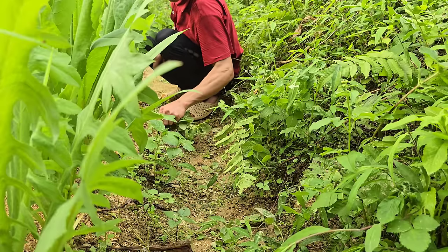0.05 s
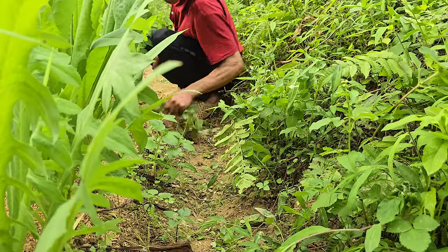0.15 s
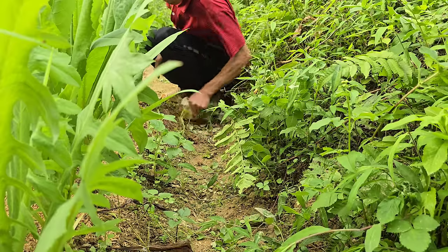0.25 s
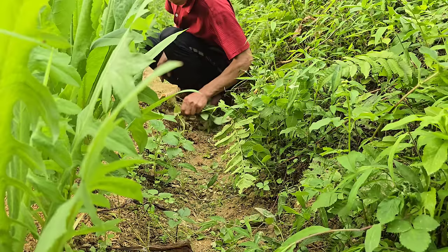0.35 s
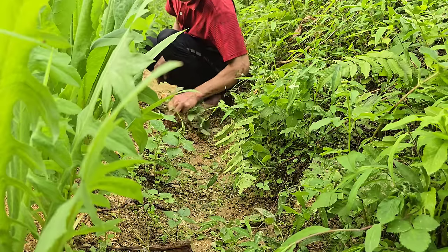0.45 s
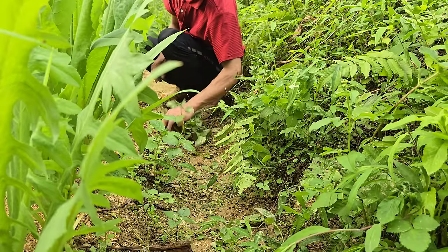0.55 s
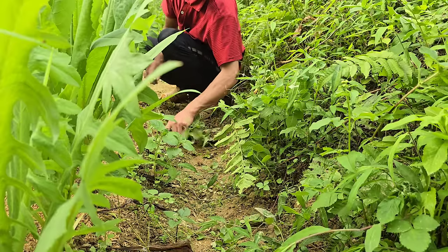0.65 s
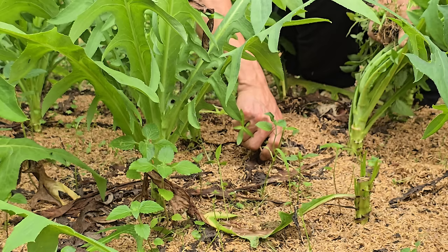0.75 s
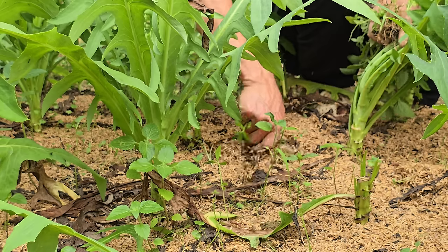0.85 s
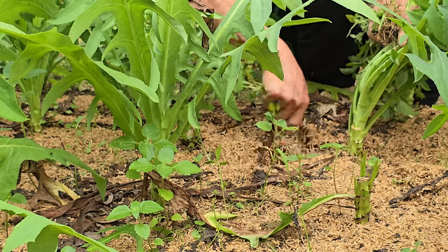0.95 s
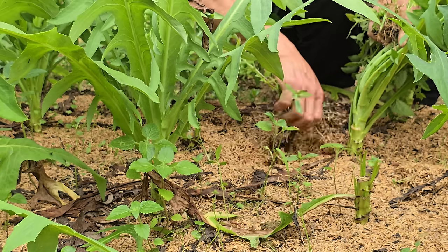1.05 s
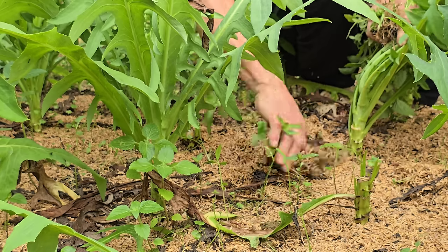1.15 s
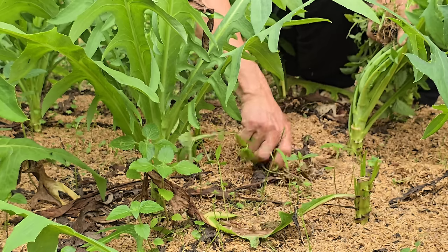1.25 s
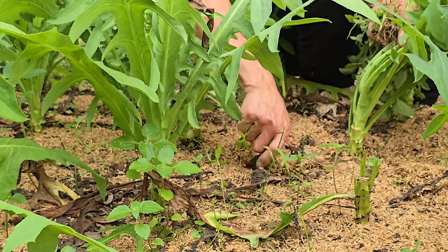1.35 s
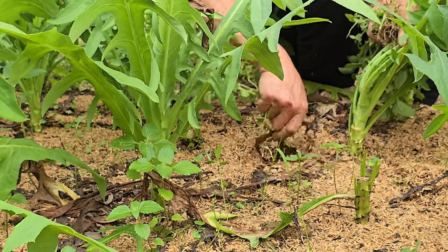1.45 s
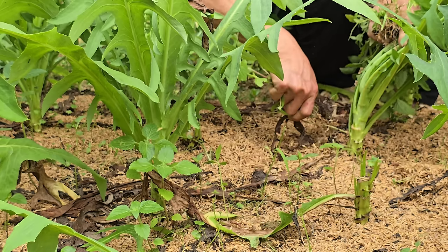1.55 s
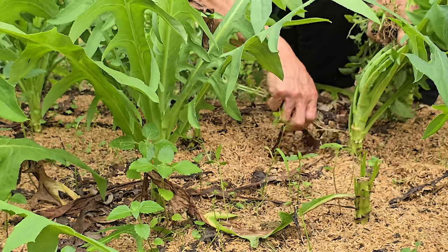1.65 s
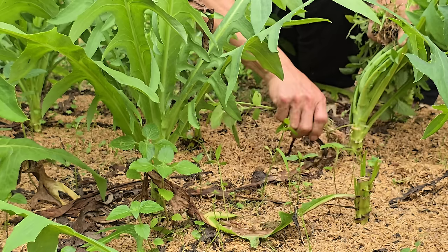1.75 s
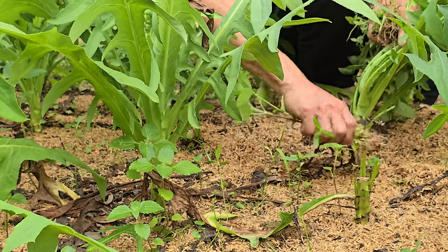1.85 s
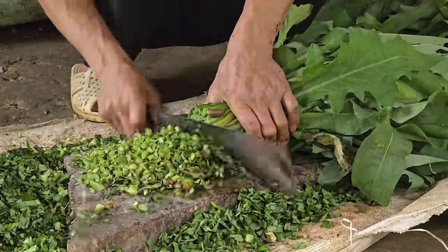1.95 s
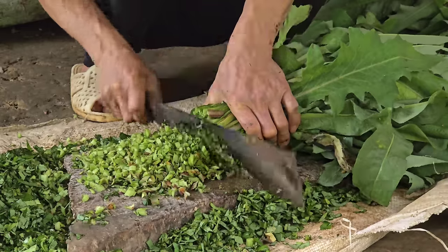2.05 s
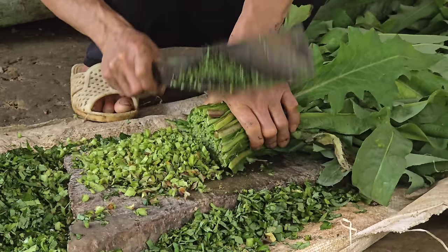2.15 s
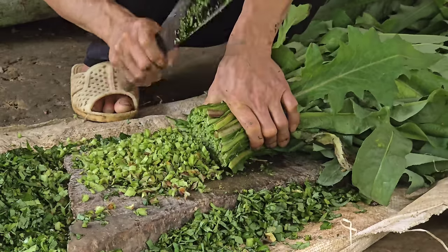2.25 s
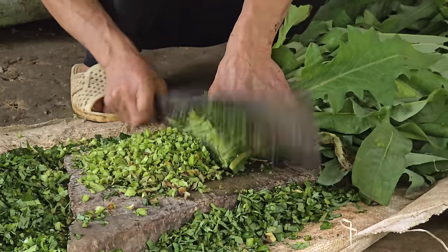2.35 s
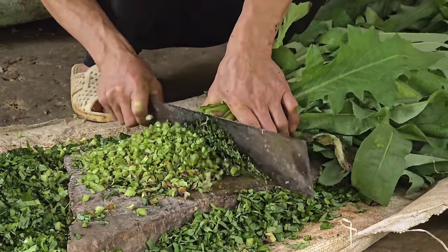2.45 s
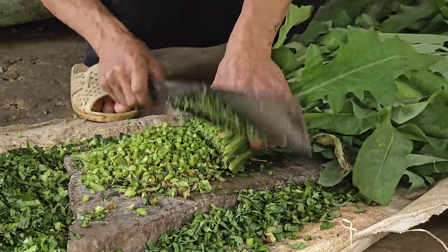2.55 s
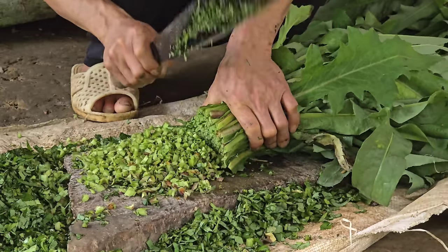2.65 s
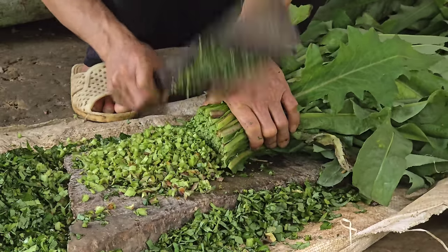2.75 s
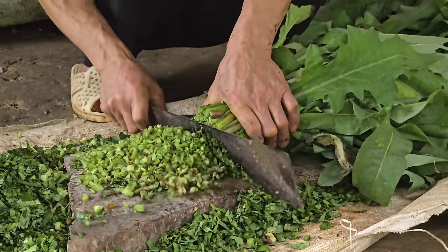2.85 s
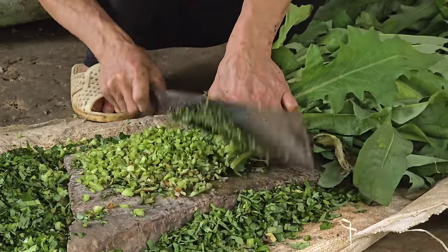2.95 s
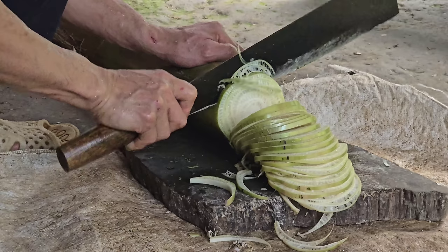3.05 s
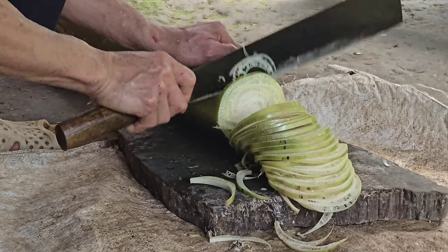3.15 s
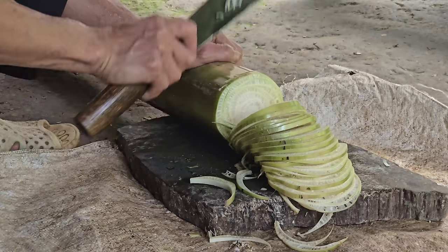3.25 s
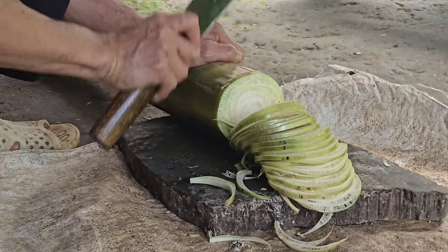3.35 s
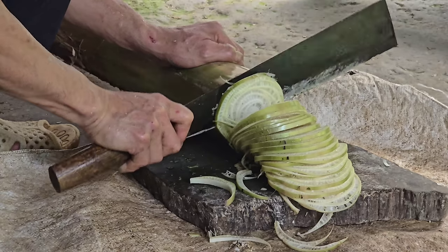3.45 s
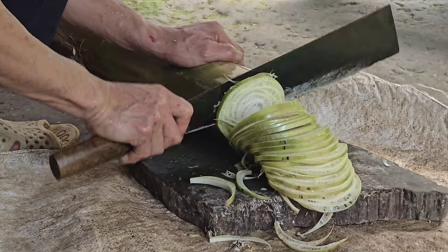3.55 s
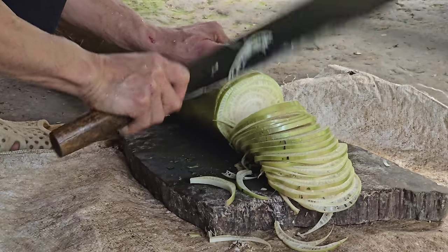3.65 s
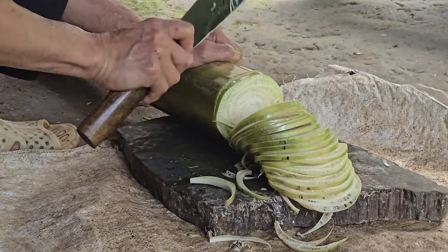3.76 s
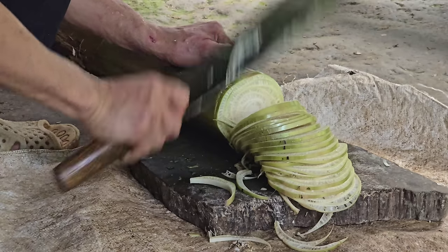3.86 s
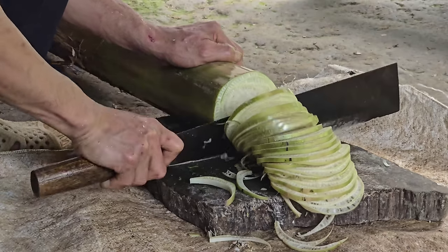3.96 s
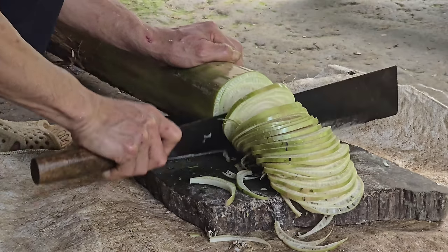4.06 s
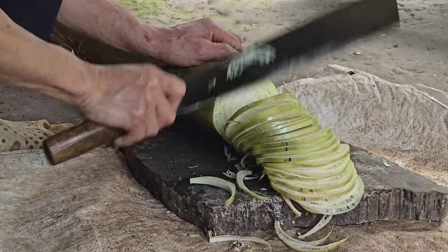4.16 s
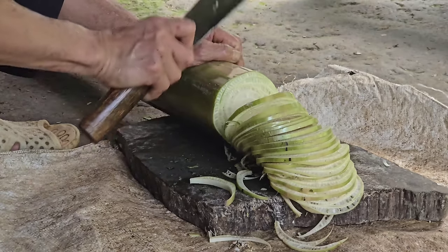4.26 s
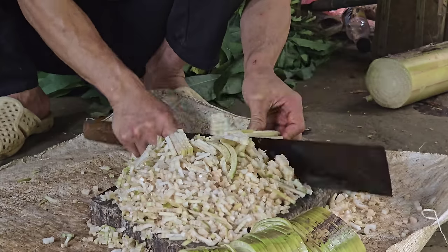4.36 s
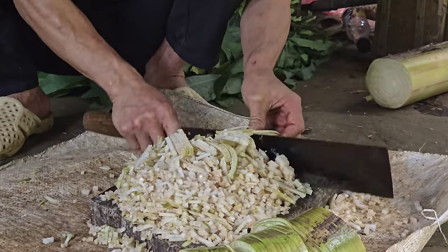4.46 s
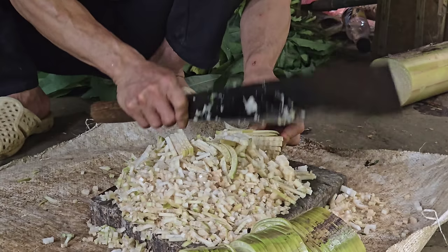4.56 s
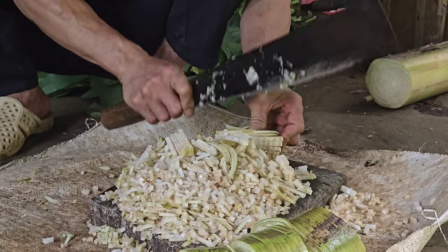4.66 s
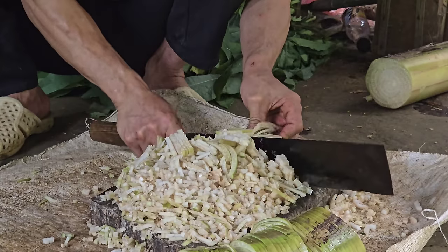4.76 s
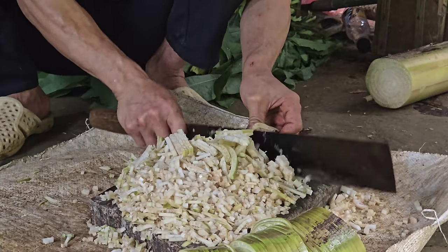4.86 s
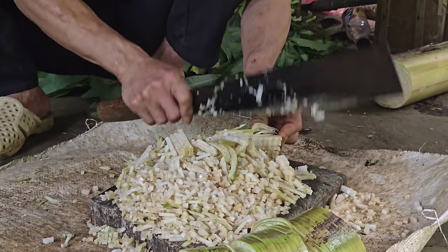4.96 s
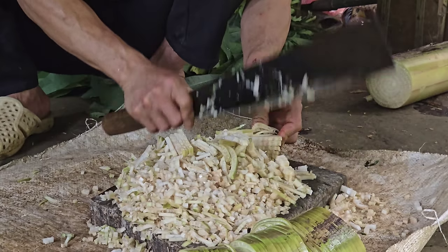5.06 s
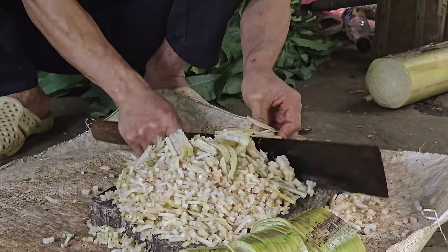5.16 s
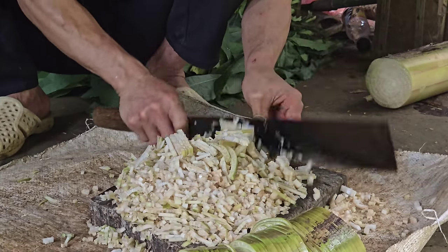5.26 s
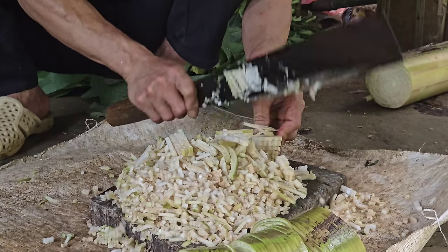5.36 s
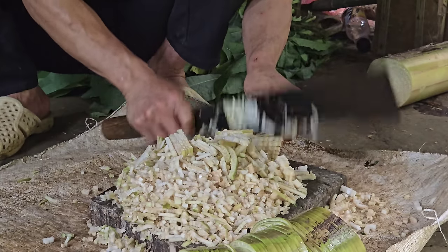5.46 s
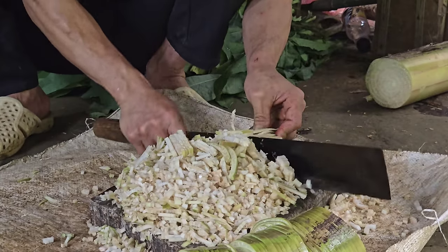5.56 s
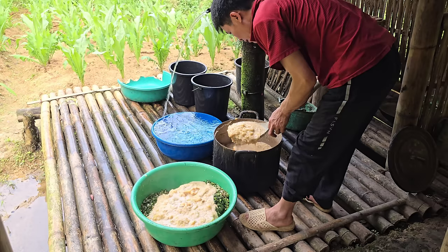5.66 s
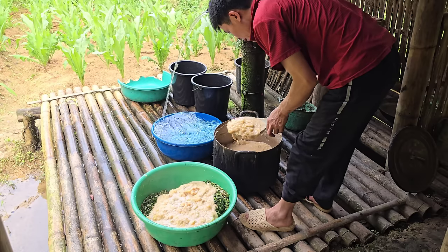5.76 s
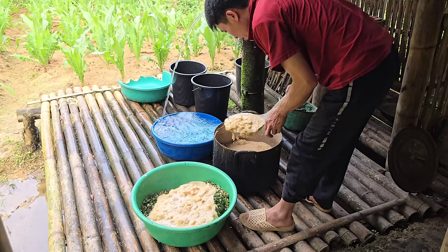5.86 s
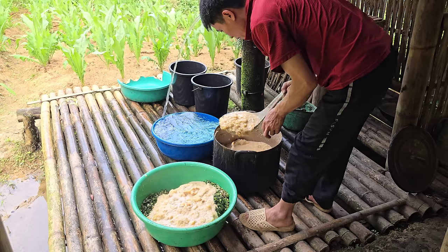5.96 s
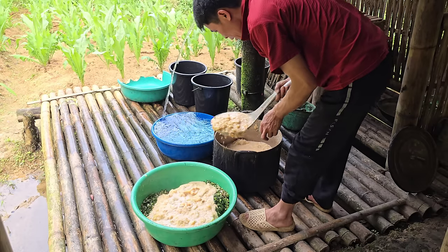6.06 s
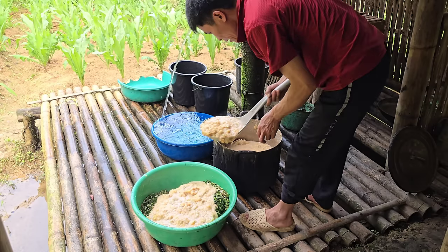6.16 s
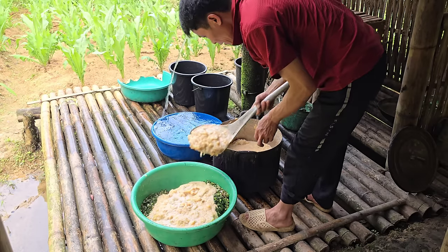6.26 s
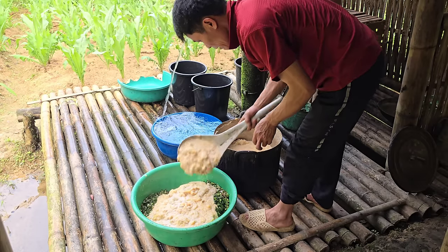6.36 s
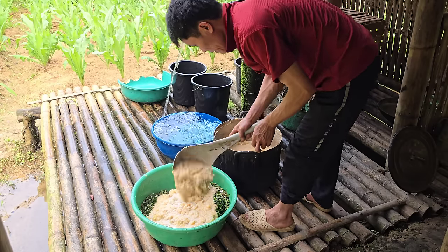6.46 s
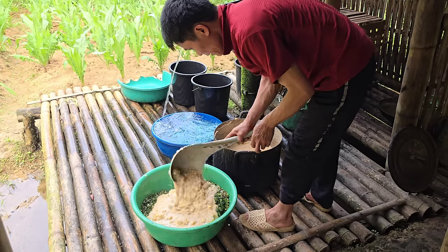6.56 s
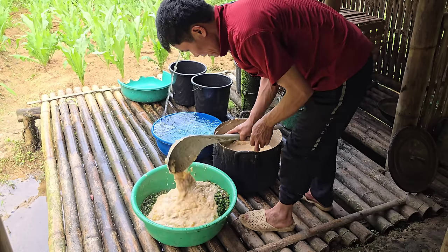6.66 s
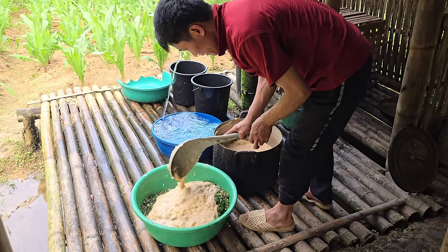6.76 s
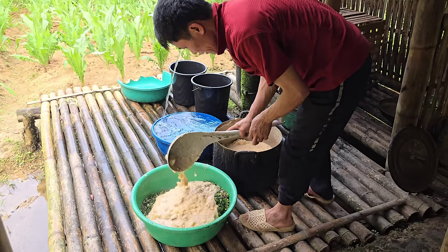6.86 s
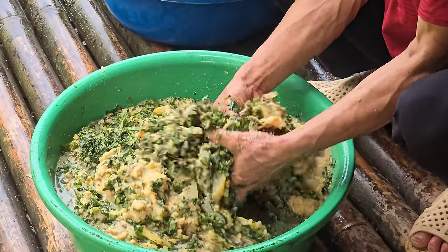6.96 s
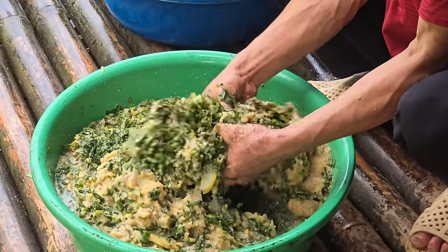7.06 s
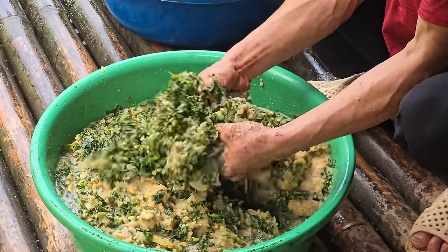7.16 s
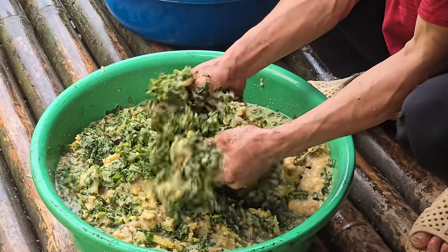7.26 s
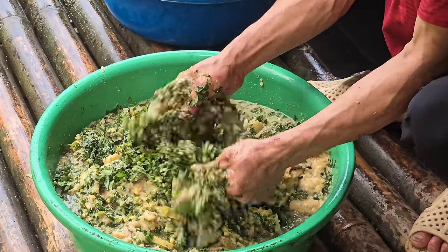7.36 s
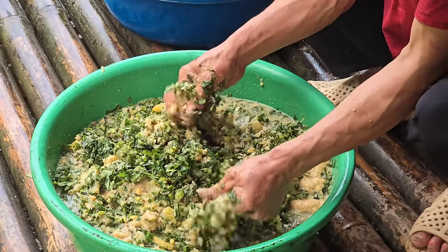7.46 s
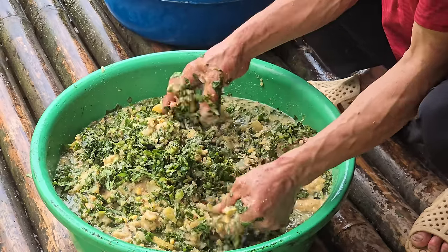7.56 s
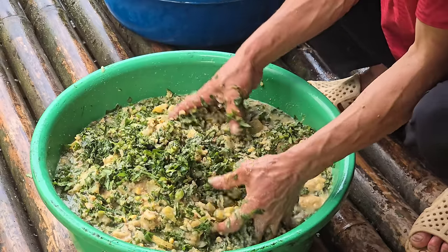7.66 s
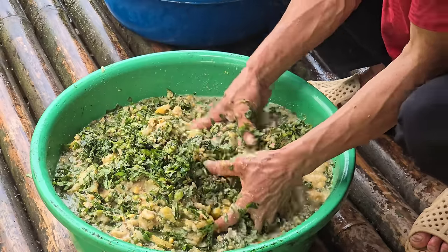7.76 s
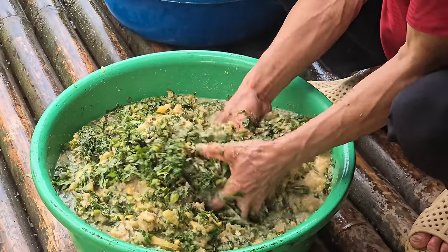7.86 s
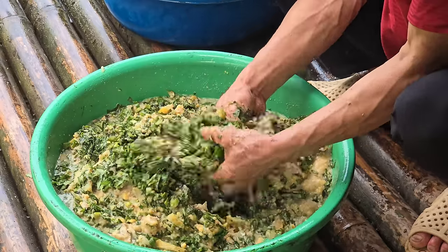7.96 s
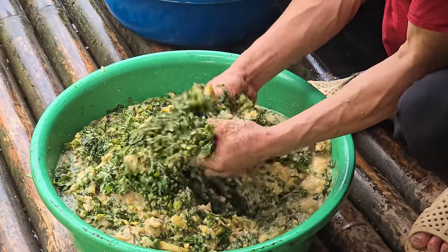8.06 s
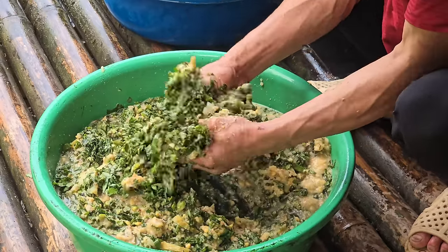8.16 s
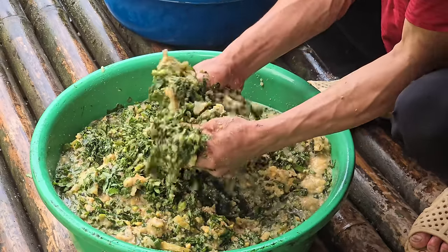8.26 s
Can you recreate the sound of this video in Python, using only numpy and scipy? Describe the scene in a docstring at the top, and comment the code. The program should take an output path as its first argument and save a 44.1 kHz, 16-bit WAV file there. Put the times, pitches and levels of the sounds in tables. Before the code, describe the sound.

Soft weeding, then a cleaver chopping greens and stem on a wooden block, followed by hands squelching wet mash in a basin.

```python
"""Making animal feed on a farm, in short outdoor scenes, each with its own air. First weeds rustle and
tear from garden soil over pulsing insects and a low hum. From 2 s a cleaver crunches through greens
and a juicy stem, and the wooden blocks ring under it. Near 6 s wet bran slops from a ladle into a
plastic basin, bubbling as its air pockets open. From 7 s two hands knead the mash, which squelches
and crackles as the air is squeezed out."""
import sys
import numpy as np
from scipy import signal
from scipy.fft import rfft, irfft, next_fast_len
from scipy.io import wavfile
from scipy.ndimage import uniform_filter1d, map_coordinates

SR = 44100
rng = np.random.default_rng(int(sys.argv[2]) if len(sys.argv) > 2 else 0)


def digitize_waveform(pressure):
    """Quantize a signal to 16-bit integers and store it at the path in sys.argv[1].

    Rows of a 2-D input are taken as channels; values are limited to [-1, 1].
    """
    field = np.atleast_2d(pressure).T
    bounded = np.clip(field, -1, 1)
    quanta = np.round(bounded * 32767).astype(np.int16)
    wavfile.write(sys.argv[1], SR, quanta)


N = 366471
TIME = np.arange(N) / SR
AGE = TIME[:SR // 3]  # clock of a single hit, in seconds

# Fizz of fine droplets in wet bran: f/Hz, level/dB
FIZZ = [(2500, -32), (5000, 0.5), (6800, -17), (8500, -12), (15500, -6.5)]


def chops():
    """The cleaver strikes the block: a crack, ringing wood, a dull thud, and a rock on the ground."""
    # Blows and bounces: t/s, ring level/dB, thud level/dB, ground level/dB, block
    blows = [(2.0308, -14.5, -18.5, -33, "greens"), (2.0452, -33, -32, -47, "greens"),
             (2.053, -22.5, -20.5, -40, "greens"), (2.8955, -7, -13.5, -32.5, "greens"),
             (2.919, -28, -25.5, -50, "greens"), (3.522, -30, -42, -34.5, "stem"),
             (4.0012, -9, -18, -21.5, "stem"), (4.0157, -17, -25, -31.5, "stem"),
             (4.4852, -18.5, -29, -33.5, "heap"), (4.8723, -10.5, -19, -33, "heap"),
             (5.2454, -9, -14.5, -31.5, "heap"), (5.6234, -10.5, -17, -34.5, "heap")]
    # Modes of each block under its load: f/Hz, level/dB, t60/s
    block_modes = { "greens": [(306, -24.5, 0.28), (400.4, -9.5, 0.11), (428, -10.5, 0.1),
                   (503, -16.5, 0.13), (555, -3, 0.065), (721, -6, 0.11), (1022, -2, 0.04),
                   (1110, -19.5, 0.11), (1507, -14.5, 0.07), (2105, -28, 0.25), (2850, -35, 0.19)],
                   "stem": [(308.5, -22, 0.13), (504, -11, 0.1), (537, -4.5, 0.11), (827, -1, 0.068),
                   (1075, -18, 0.096), (1216, 4.5, 0.024), (1350, -6.5, 0.054), (1594, -21, 0.12),
                   (2028, -15, 0.11), (2412, -24, 0.1)], "heap": [(456, -17, 0.17), (479.5, -5, 0.11),
                   (503, 0.5, 0.069), (571.2, 4.5, 0.1), (610, -29, 0.24), (916, -5, 0.078),
                   (1018, -1, 0.072), (1299, -5, 0.08), (1478, -12, 0.074), (2027, -24, 0.11),
                   (2866, -24.5, 0.083)]}
    # The edge biting each block: f/Hz, level/dB relative to the ring
    bites = {"greens": (2700, -9), "stem": (2000, -10), "heap": (2700, -10)}
    # Colour of the thud: f/Hz, level/dB
    thud_colour = [(40, -10), (85, -17), (200, 4), (320, -6), (500, 2.5), (1100, -5.5), (1800, -15.5),
                   (2800, -16.5), (4200, -36), (15000, -109)]
    # The block rocking on the ground: f/Hz, level/dB, t60/s
    ground_modes = [(123.5, -5, 0.21), (156.7, 0.5, .17)]
    out = np.zeros(N)
    contact = 1 - fade(.002)  # the pulp cushions the blow
    for s, db, thud_db, ground_db, block in blows:
        modes, (crack_hz, crack_db) = block_modes[block], bites[block]
        thud = amp(thud_db) * coloured(rng.standard_normal(len(AGE)), thud_colour) * fade(.15)
        low_cut_hz = .86 * modes[0][0]  # little radiates below the lowest mode
        wood = highpass(contact * (thud - amp(db) * ring(modes)), low_cut_hz, order=4)
        crack = amp(db + crack_db) * band(crack_hz, q=1.2) * fade(.014)
        rocking = ring(ground_modes) + 1.16 * band(centre_hz=130, q=.75) * fade(.17)
        ground = highpass(rocking * (1 - fade(.024)), hz=58, order=3)
        add(out, s, wood + crack + amp(ground_db) * ground)
    return out


def cuts():
    """Cells burst in a dense crunch that swells while the blade sinks, then dies away."""
    # Strokes through the stalks: start/s, end/s, crunch level/dB, hiss level/dB
    strokes = [(2.014, 2.033, -31.5, -42), (2.439, 2.466, -27, -27), (2.881, 2.887, -27, -29.5),
               (3.513, 3.538, -24, -20.5), (3.97, 3.994, -23.5, -20.5), (4.452, 4.51, -36, -42.5),
               (4.496, 4.52, -22, -18.5), (4.833, 4.871, -31, -33.5), (5.208, 5.245, -31.5, -40.5),
               (5.587, 5.623, -35, -40.5)]
    # Crunch of the fibres: f/Hz, level/dB
    crunch_colour = [(50, -24), (120, 5), (330, -1), (500, 7), (800, -1.5), (1400, 3), (2500, -3),
                     (4500, -4), (8000, -15), (16000, -44)]
    # Hiss of the juice: f/Hz, level/dB
    juice_colour = [(1000, -39), (3000, -7), (5000, 2), (7000, -3), (11000, 2.5), (15500, 0.5)]
    out = np.zeros(N)
    for start, end, crunch_db, hiss_db in strokes:
        past_end = AGE - (end - start)
        swell_db = np.where(past_end < 0, 110 * past_end, -520 * past_end)
        stroke = (1 - fade(.044)) ** 2 * amp(swell_db)
        fibres = coloured(crackle(rate=6200, spread_db=1.5, size=len(AGE)), crunch_colour)
        juice = coloured(crackle(rate=4500, spread_db=3.5, size=len(AGE)), juice_colour)
        add(out, start, stroke * (amp(crunch_db) * fibres + amp(hiss_db) * juice))
    return out


def kneading():
    """Hands push the mash against the basin; air pockets pop and ring its hollows, wet leaves tick."""
    # Colour of the wet mash: f/Hz, level/dB
    mash_colour = [(300, -51), (500, -3.5), (760, -2), (900, -12), (1200, -6.5), (1420, -5), (1650, -8),
                   (1850, -10), (2090, 1), (2400, -6.5), (3700, -3.5), (5300, -21), (6500, -35),
                   (15000, -37)]
    # Hollows between hands, mash and basin: f/Hz, level/dB, t60/s
    hollows = [(729, -4.5, 0.095), (1418, 3.5, 0.068), (1740, 6.5, 0.028), (2084, 3.5, 0.11),
               (2715, 1.5, 0.055), (3780, 1, 0.046)]
    # Body of the plastic basin: f/Hz, level/dB
    basin_colour = [(50, -40.5), (105, -37), (130, -21), (180, 4), (210, -11), (238, 6), (275, -8.5),
                    (330, 2), (420, -14), (900, -21.5)]
    # Single squelches: t/s, level/dB, f/Hz, spray level/dB relative to the cavity
    squelches = [(7.098, -18, 1430, -18), (7.111, -22, 1466, -12), (7.146, -24.5, 1450, -10),
                 (7.2644, -22, 2114, -20), (7.3008, -21, 2094, -6), (7.317, -26, 2250, -4),
                 (7.3657, -27, 1114, -2), (7.4455, -24.5, 2100, -4.5), (7.46, -27, 1395, -12),
                 (7.5383, -22, 1360, -7), (7.6934, -27, 2100, -6), (7.7284, -26, 2170, -20),
                 (7.766, -15.5, 1437, -27), (7.7708, -12.5, 2020, -29), (7.789, -21.5, 1410, -14),
                 (7.9164, -20.5, 1397, -15), (7.9853, -24, 2390, -23), (8.0342, -25.5, 1324, -20),
                 (8.0726, -23, 2800, -14), (8.1428, -27, 2080, -12), (8.1948, -17, 2040, -23),
                 (8.21, -24.5, 2040, -9), (8.2287, -18, 1414, -11)]
    start, end = 7.08, 8.4
    work = effort(start, end)
    pops = bubbles(start, end, rate=380, centre_hz=2047, octaves=1.408, cycles=21, spread_db=1.5)
    popping = coloured(pops, mash_colour) * span_gain(start, end)
    shapes = [ring(hollows, shift) for shift in (.97, 1, 1.03)]  # moving hands resize the hollows
    ringing = sum(signal.fftconvolve(crackle(rate=60, spread_db=2.5), shape)[:N] for shape in shapes)
    leaf_ticks = coloured(crackle(rate=1100, spread_db=4.5), mash_colour)
    wet = amp(-37.5) * work * (.72 * popping + .3 * leaf_ticks + .63 * unit(ringing))
    clumps = unit(amp(1.6 * wobble(rate=70)))  # the pockets pop in clumps
    fizz = amp(-43.5) * work ** .45 * coloured(crackle(rate=5500, spread_db=2.5), FIZZ)
    basin = highpass(coloured(crackle(rate=600, spread_db=4), basin_colour), hz=82, order=2)
    out = clumps * (wet + fizz) + amp(-44.5) * work ** .96 * basin + film_snaps()
    out += squirts(squelches, gain_db=-8, q=7, tone=.6, ring_t60=.13, spray_t60=.13)
    return highpass(out, hz=75, order=3)


def effort(start, end):
    """How hard the hands work: separate presses over a light, steady stirring."""
    # Presses into the mash: t/s, hold/s, level/dB
    presses = [(7.086, 0.092, -0.5), (7.246, 0.24, -0.5), (7.476, 0.22, -1), (7.656, 0.21, 0.5),
               (7.906, 0.217, -0.5), (8.188, 0.12, -0.5)]
    grip_s, release_s = .009, .035
    stirring = amp(-4.5) * held(start, end, grip_s, release_s)
    pressing = [amp(db) * held(s, s + hold, grip_s, release_s) for s, hold, db in presses]
    return np.max([stirring, *pressing], axis=0)


def film_snaps():
    """Wet films burst, each with a sharp tick and a softer smack."""
    # Bursts: t/s, level/dB
    snaps = [(7.2647, -26), (7.366, -22), (7.6964, -21), (7.803, -23), (7.8145, -20), (8.035, -21.5),
             (8.073, -14.5)]
    out = np.zeros(N)
    snap_hz = 2600
    for s, db in snaps:
        tick = np.cos(2 * np.pi * snap_hz * AGE) * fade(.003)
        smack = amp(-11) * band(snap_hz, q=.7) * fade(.045)
        add(out, s, amp(db) * (tick + smack))
    return out


def squirts(events, gain_db, q, tone, ring_t60, spray_t60):
    """Air squeezed from wet pulp sounds an opening cavity: a rising tone, a gurgle and a fine spray."""
    spray_colour = [(400, -19), (1500, 6.5), (4000, 1.5), (15000, -5)]  # f/Hz, level/dB
    out = np.zeros(N)
    opening = 1 - fade(.006)
    for s, db, hz, spray_db in events:
        note = np.sqrt(2) * np.sin(2 * np.pi * (hz * AGE * (1 + AGE) + rng.random()))
        cavity = (tone * note + (1 - tone) * band(hz, q)) * fade(ring_t60)
        droplets = coloured(crackle(rate=13000, spread_db=4.5, size=len(AGE)), spray_colour)
        spray = amp(spray_db) * droplets * fade(spray_t60)
        add(out, s - .001, amp(db + gain_db) * (cavity + spray) * opening)
    return out


def ladling():
    """Wet bran gurgles and slops off the ladle, then bubbles quietly for as long as it is stirred."""
    # Scoops and landings: t/s, level/dB, f/Hz, spray level/dB relative to the cavity
    slops = [(5.852, -36.5, 1750, -1), (5.931, -49, 1920, 3), (5.995, -47, 1950, -3), (6.03, -51, 1730, 2),
             (6.066, -53.5, 1630, 8.5), (6.160, -39.5, 2280, -6), (6.253, -50, 4300, 0),
             (6.368, -46, 1670, -16), (6.386, -42.5, 2420, -4), (6.445, -45, 1510, -16),
             (6.467, -43, 2010, -2), (6.566, -41, 1900, 7), (6.604, -52.5, 1470, 9), (6.638, -43, 2260, -4),
             (6.756, -46, 2360, -1), (6.860, -53.5, 2080, 10), (7.035, -38.5, 2690, -13)]
    pour, stir = (5.85, 7.05), (6.6, 8.4)  # start/s, end/s
    pops = bubbles(*stir, rate=240, centre_hz=1744, octaves=1.486, cycles=28, spread_db=3.5)
    bubbling = unit(pops) * span_gain(*stir)
    drizzle = amp(-1) * coloured(crackle(rate=2500, spread_db=5), FIZZ)
    flow = amp(-58) * held(*stir, attack_s=.025, release_s=.03)
    pockets = bubbles(*pour, rate=75, centre_hz=1600, octaves=.9, cycles=26, spread_db=2)
    gurgle = amp(-54) * unit(pockets) * span_gain(*pour)
    slopping = squirts(slops, gain_db=4.5, q=4, tone=.35, ring_t60=.095, spray_t60=.11)
    return gurgle + flow * (bubbling + drizzle) + slopping


def bubbles(start, end, rate, centre_hz, octaves, cycles, spread_db):
    """Tiny air pockets open; each rings for some cycles with a rising pitch."""
    when, pitch, size, life = rng.random((4, 6000))[:, :int(rate * (end - start))]
    hz = centre_hz * 2 ** (octaves * (2 * pitch[:, None] - 1))
    t = AGE[:600]
    life_spent = t * hz / (cycles * (.5 + life[:, None]))
    rise = 1 + .087 * np.minimum(life_spent, 2)
    strength = amp(-spread_db * np.log(size[:, None] + .085))
    rings = strength * np.exp(-2 * life_spent) * np.sin(2 * np.pi * hz * t * rise)
    onsets = ((start + when * (end - start)) * SR).astype(int)
    samples = onsets[:, None] + np.arange(len(t))
    return np.bincount(samples.ravel(), rings.ravel(), N)[:N]


def handling():
    """Leaves rustle and roots tear from loose soil with a soft thump; hands and tools tap."""
    # Brushes against leaves and crumbs: t/s, level/dB, length/s
    rustles = [(0.153, -56, 0.019), (0.567, -52.5, 0.057), (0.972, -55, 0.24), (1.325, -54.5, 0.11),
               (1.434, -48.5, 0.082), (1.8, -57, 0.059), (2.31, -46.5, 0.04), (3.742, -51, 0.17),
               (3.965, -52.5, 0.24), (4.307, -49, 0.043)]
    # Colour of the leaves: f/Hz, level/dB
    leaf_colour = [(250, -6), (1300, -0.5), (3000, 14.5), (6000, -3.5), (15000, -7.5)]
    # Roots leaving the soil: t/s, thump level/dB, rustle level/dB
    tugs = [(0.98, -33, -35), (1.255, -42, -38), (1.317, -45, -32), (1.397, -39, -47), (1.499, -41, -37),
            (1.654, -44, -45), (1.73, -36, -43), (1.845, -36, -39), (1.894, -35, -39)]
    # Tearing roots and crumbs: f/Hz, level/dB
    soil_colour = [(200, -6), (500, 3), (1200, -3), (3000, -3), (6000, 0), (15000, -1)]
    # Light, dry taps: t/s, level/dB, f/Hz
    taps = [(0.22, -31.5, 430), (.2205, -36.5, 1390), (0.995, -43, 3000), (1.258, -51, 446),
            (1.392, -45, 480), (1.501, -47, 455), (1.607, -45.5, 1200), (1.763, -47, 497),
            (1.925, -49, 560), (2.304, -52.5, 400)]
    brushing = sum(amp(db) * np.exp(-(2 * (TIME - s) / length) ** 2) for s, db, length in rustles)
    leaves = coloured(crackle(rate=1500, spread_db=4), leaf_colour)
    out = brushing * patchy(leaves, depth_db=4.5)
    for s, thump_db, rustle_db in tugs:
        thump = amp(thump_db - 7) * band(centre_hz=197.5, q=3.3)
        crumbs = crackle(rate=2200, spread_db=3, size=len(AGE))
        soil = amp(rustle_db - 5.5) * coloured(crumbs, soil_colour)
        add(out, s - .008, (thump + soil) * fade(.17) * (1 - fade(.037)))
    for s, db, hz in taps:
        add(out, s, amp(db + 2.5) * band(hz, q=.85) * fade(.036) * (1 - fade(.0016)))
    return out


def walls(x):
    """The farm buildings answer with a short, diffuse stereo tail."""
    # Decay of the tail: f/Hz, t60/s
    decay = [(100, 0.62), (500, 0.13), (2000, 0.36), (10000, 0.27)]
    hz, t, noise = signal.stft(rng.standard_normal((2, SR // 2)), SR, nperseg=256)
    dying = noise * np.exp(-np.log(1000) * t / along(decay, hz)[:, None])
    tail = signal.istft(dying, SR, nperseg=256)[1]
    delayed = np.pad(x, (round(.016 * SR), 0))
    return signal.fftconvolve(delayed[None], tail / np.linalg.norm(tail[0]), axes=1)[:, :N]


def insects():
    """Garden insects: a high hiss that pulses quickly."""
    # Colour of their song: f/Hz, level/dB
    song_colour = [(5000, -35), (8000, -0.5), (9700, -2), (12300, -18), (15500, -9)]
    pulse_hz, depth_db = 16.7, 2.2
    pulsing_db = depth_db * np.sin(2 * np.pi * pulse_hz * TIME)
    return amp(-53 + pulsing_db) * coloured(rng.standard_normal(N), song_colour)


def hum():
    """A low hum by the vegetable bed wavers in pitch and level for about a second."""
    hum_hz = 62
    note = np.sqrt(2) * np.sin(2 * np.pi * hum_hz * TIME + .6 * wobble(rate=9))
    level = amp(-59.5 + 2.2 * wobble(rate=13))
    return level * held(start=.8, end=1.83, attack_s=.017, release_s=.034) * note


def air():
    """The outdoor air of each place crossfades into the next, with insects and a hum early on."""
    # Colour of the air in each place: f/Hz, level/dB
    garden = [(15, -31), (25, 2.5), (140, -2.5), (240, -13.5), (536, -10), (745, -19.5), (839, -20.5),
              (1510, -17), (1780, -19), (4690, -22), (7000, -16), (9100, -31), (15400, -120)]
    vegetable_bed = [(65, -45), (110, -20), (201, 1.5), (336, -12), (440, -3.5), (588, -16.5), (1070, -12),
                     (1430, -16.5), (2500, -13.5), (3100, -10), (4380, -15.5), (5450, -9), (6770, -14.5),
                     (8000, -10), (10000, -10.5), (12600, -18), (15500, -9.5)]
    yard = [(24, -26), (40, -21.5), (247, 2), (325, -8.5), (758, -10.5), (838, -16), (1820, -11.5),
            (2990, -10), (3840, -12.5), (5440, -16), (15500, -21.5)]
    shade = [(24, -43), (40, -12), (75, 5), (188, 2.5), (309, 1), (377, -7), (509, -3), (903, -7.5),
             (3060, -8), (5720, -14), (15500, -19)]
    deck = [(53, -64), (90, -44), (222, 0), (307, -9), (667, 0.5), (793, -10), (1450, -6.5), (1760, -10),
            (2000, -1.5), (5750, -10.5), (8300, -7), (14500, -16.5), (15500, -11)]
    # Where one place gives way to the next: t/s
    edges = [-1, .9, 2.15, 3.25, 4.45, 5.73, 9]
    places = [garden, vegetable_bed, yard, shade, yard, deck]
    levels_db = [-52.5, -45, -53.5, -49.5, -52.5, -47]
    beds = np.zeros(N)
    for start, end, db, colour in zip(edges, edges[1:], levels_db, places):
        beds += amp(db) * crossfade(start, end) * coloured(rng.standard_normal(N), colour)
    return crossfade(*edges[:2]) * insects() + hum() + patchy(beds, depth_db=1.4)


def amp(db):
    """Decibels to gain."""
    return 10 ** (np.asarray(db) / 20)


def unit(x):
    """Scale to rms 1."""
    return x / np.sqrt(np.mean(x ** 2) + 1e-20)


def span_gain(start, end):
    """Gain that turns rms 1 over the whole track into rms 1 over the span that sounds."""
    return np.sqrt((end - start) * SR / N)


def add(track, s, x):
    """Mix x into the track at time s."""
    part = track[max(round(s * SR), 0):][:len(x)]
    part += x[:len(part)]


def fade(t60):
    """Exponential decay, 60 dB down after t60 seconds."""
    return np.exp(-np.log(1000) * AGE / t60)


def held(start, end, attack_s, release_s):
    """An envelope that rises at start, holds until end and dies away."""
    attack = 1 - np.exp(-np.maximum(TIME - start, 0) / attack_s)
    return attack * np.exp(-np.maximum(TIME - end, 0) / release_s)


def crossfade(start, end):
    """A window with 50 ms equal-power edges."""
    return np.sqrt(np.clip(.5 + 20 * np.minimum(TIME - start, end - TIME), 0, 1))


def wobble(rate):
    """A smooth random curve, rate knots a second."""
    return map_coordinates(rng.standard_normal(4096), [TIME * rate], mode="wrap")


def ring(modes, shift=1):
    """Struck modes (f/Hz, level/dB, t60/s), their balance a little different on every hit."""
    return sum(amp(db + rng.normal(0, .7)) * fade(t60) * np.sin(2 * np.pi * hz * shift * AGE)
               for hz, db, t60 in modes)


def band(centre_hz, q):
    """A short noise in one resonance, at rms 1."""
    def resonance(hz):
        detuning = (hz + 1) / centre_hz - centre_hz / (hz + 1)
        return 1 / (1 + (q * detuning) ** 2)
    return unit(filtered(rng.standard_normal(len(AGE)), resonance))


def crackle(rate, spread_db, size=N):
    """Random ticks of uneven strength, about rate a second, at rms 1."""
    chance, strength = rng.random(size), rng.standard_normal(size)
    ticks = (chance < rate / SR) * rng.choice([-1, 1], size)
    return unit(ticks * amp(spread_db * np.clip(strength, -2, 2)))


def along(points, hz):
    """Read a curve of (f/Hz, value) points on a log frequency axis."""
    freqs, values = np.transpose(points)
    return np.interp(np.log(hz + 1), np.log(freqs + 1), values)


def filtered(x, response):
    """Apply a gain given as a function of frequency."""
    n = x.shape[-1]
    padded = next_fast_len(n + 8192)
    return irfft(rfft(x, padded) * response(np.fft.rfftfreq(padded, 1 / SR)), padded)[..., :n]


def coloured(x, colour):
    """Shape x with an EQ curve (f/Hz, level/dB), at rms 1."""
    return unit(filtered(x, lambda hz: amp(along(colour, hz))))


def highpass(x, hz, order):
    """Causal low cut."""
    return signal.sosfilt(signal.butter(order, hz, "highpass", fs=SR, output="sos"), x)


def patchy(x, depth_db):
    """Let the level drift from patch to patch of time and frequency."""
    frames = signal.stft(x, nperseg=512)[2]
    field = uniform_filter1d(rng.standard_normal(frames.shape), size=4, axis=0)
    field = uniform_filter1d(field, size=7, axis=1)
    return signal.istft(frames * unit(amp(depth_db * unit(field))), nperseg=512)[1][:N]


def stereo(source, width, alike):
    """Widen a source: part is the same sound leading on the left, part is scatter from nearby."""
    mid = source()
    scatter = np.roll(source(), round(.003 * SR))
    difference = alike * mid + np.sqrt(1 - alike ** 2) * scatter
    side = filtered(difference, lambda hz: 1j * amp(along(width, hz)))
    return np.array([mid + side, mid - side])


def scene():
    """All sources in the open air; the blocks are close and echo from the buildings."""
    # Width of the close blocks and of the diffuse sound: f/Hz, side level/dB relative to mid
    near = [(100, -20.5), (500, -12), (1200, -5.5), (3000, -2.5), (10000, 1)]
    wide = [(60, -13.5), (250, -12), (600, -5), (1200, -2), (4000, 0), (12000, 0)]
    blade = stereo(lambda: chops() + cuts(), near, alike=.66)
    feed = stereo(lambda: ladling() + kneading(), wide, alike=.71)
    outdoors = stereo(lambda: air() + handling(), wide, alike=.45)
    return blade + amp(-22) * walls(blade.mean(axis=0)) + feed + outdoors


def record(dry):
    """Soft clipping rounds the highest peaks, and a steep high cut takes off the very top."""
    ceiling, top_hz = .9, 15800
    rounded = dry / (1 + np.abs(dry / ceiling) ** 6) ** (1 / 6)
    return filtered(rounded, lambda hz: 1 / (1 + (hz / top_hz) ** 160))


dry = scene()
out = record(dry)
digitize_waveform(out)
```